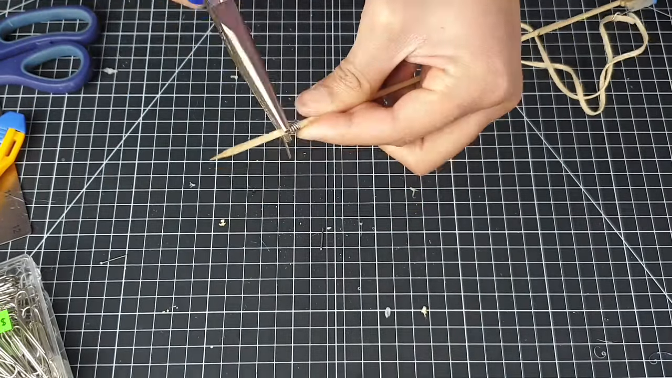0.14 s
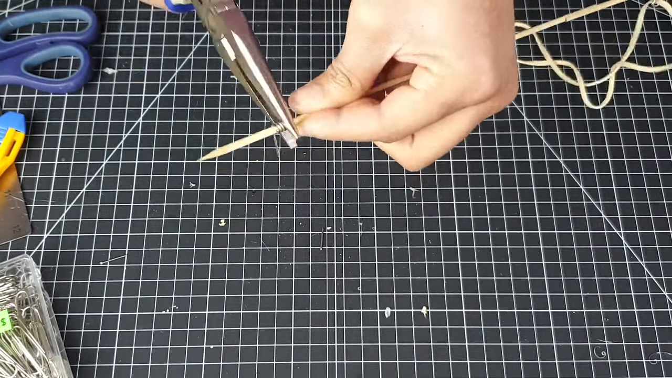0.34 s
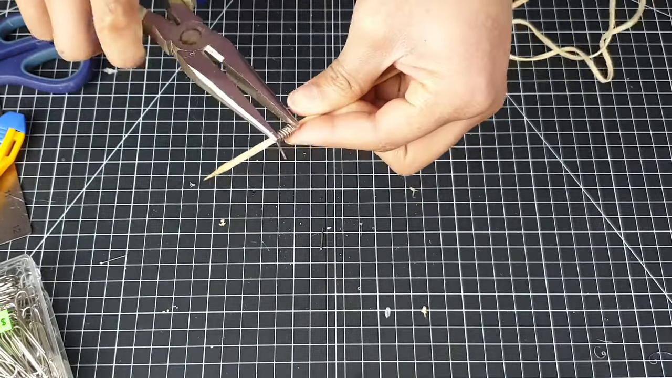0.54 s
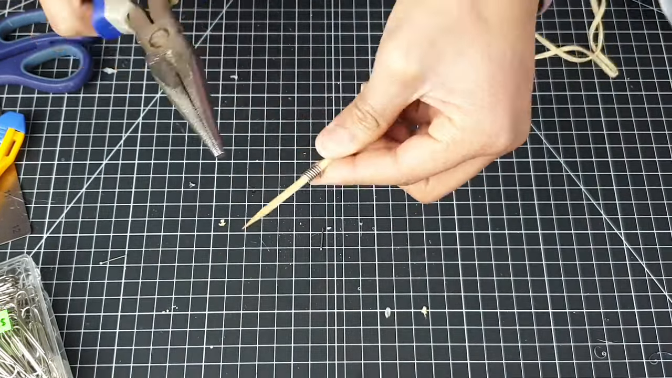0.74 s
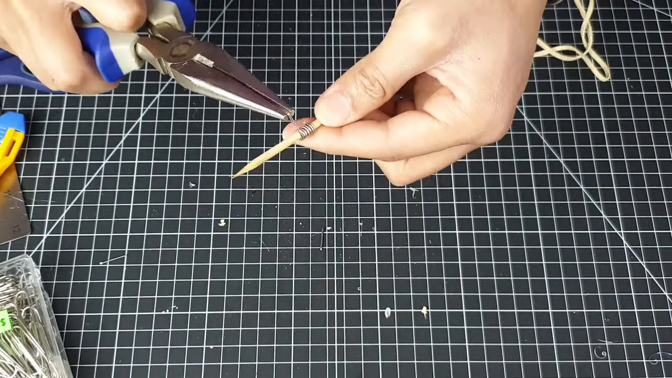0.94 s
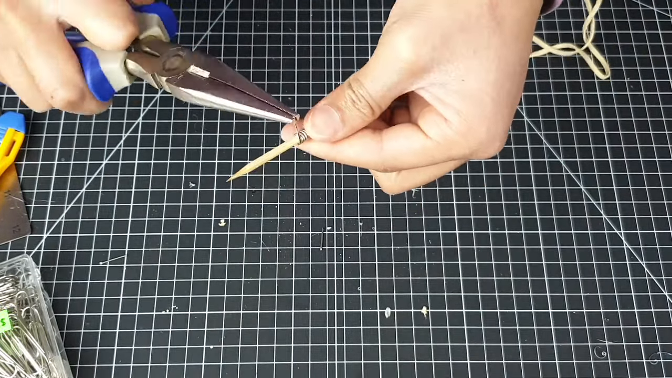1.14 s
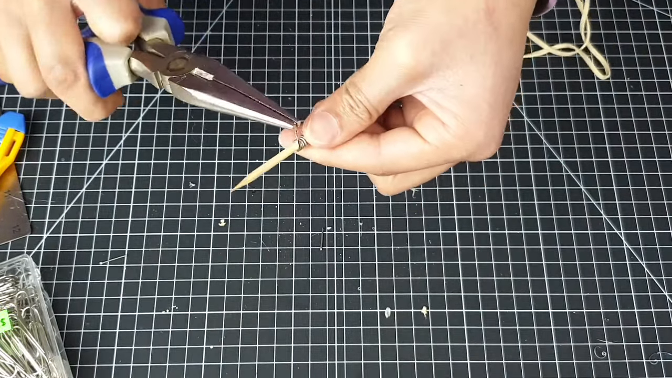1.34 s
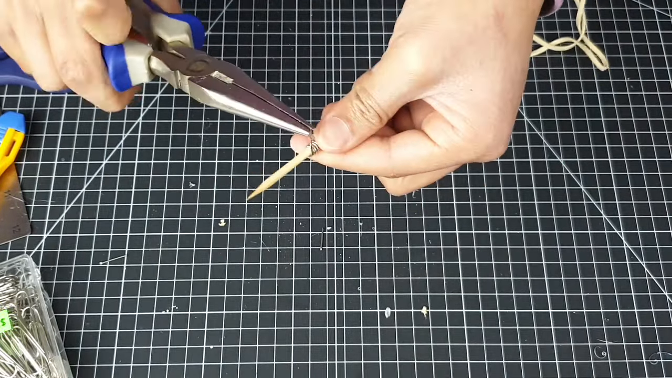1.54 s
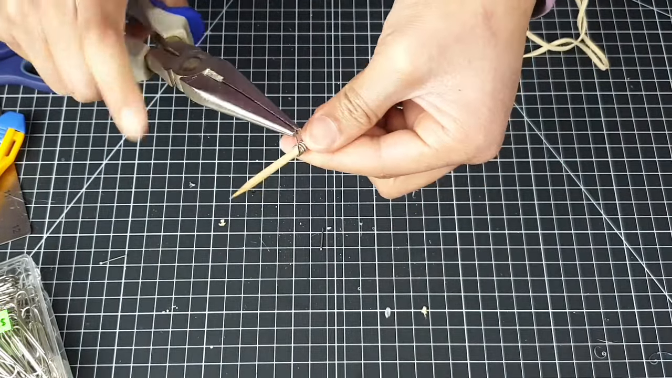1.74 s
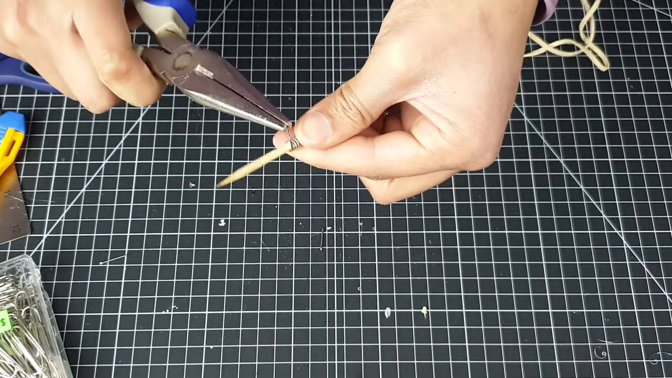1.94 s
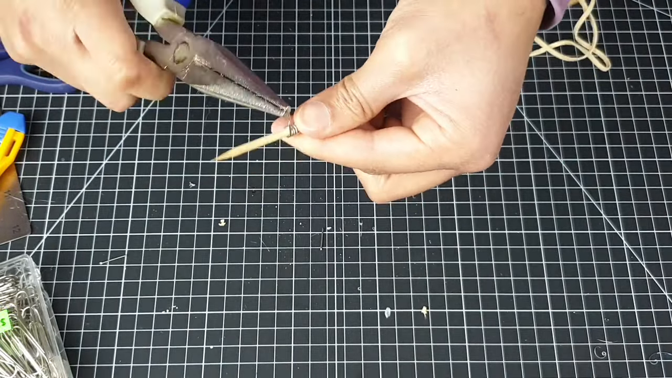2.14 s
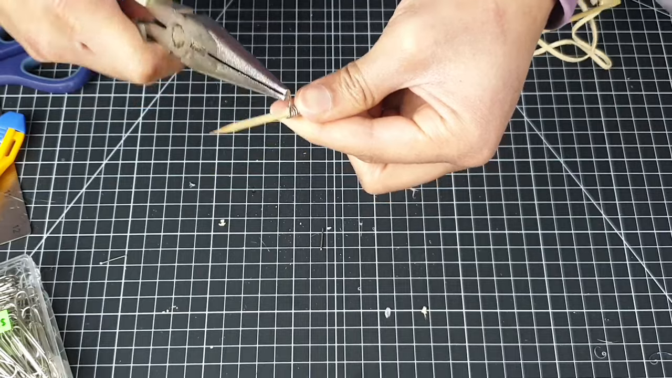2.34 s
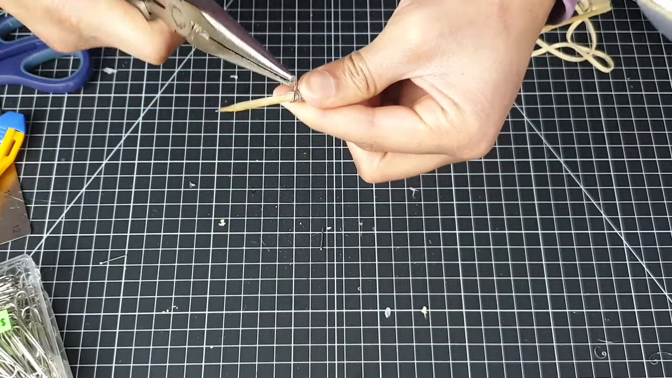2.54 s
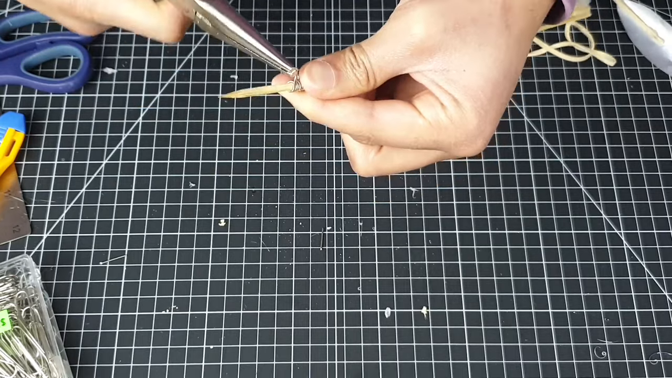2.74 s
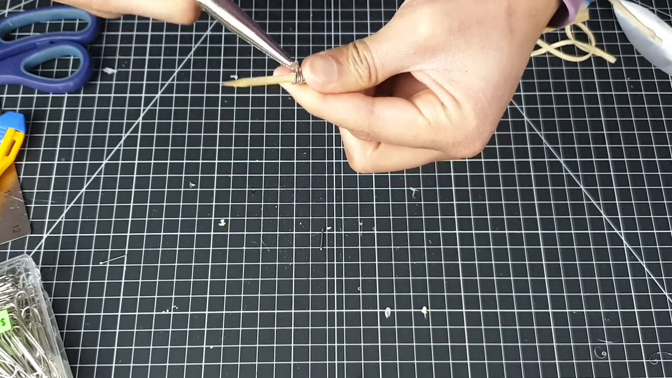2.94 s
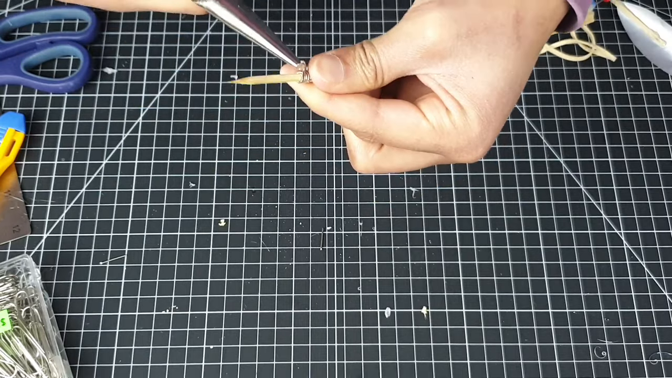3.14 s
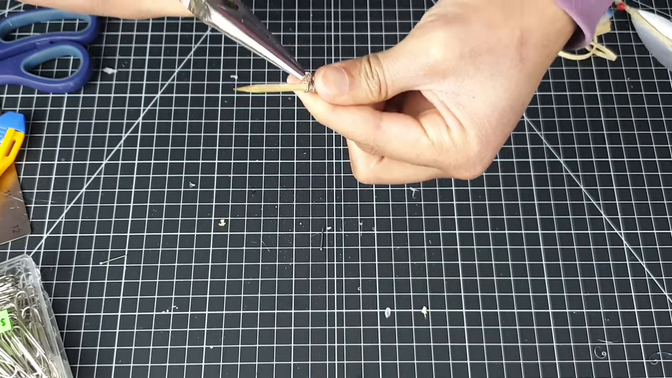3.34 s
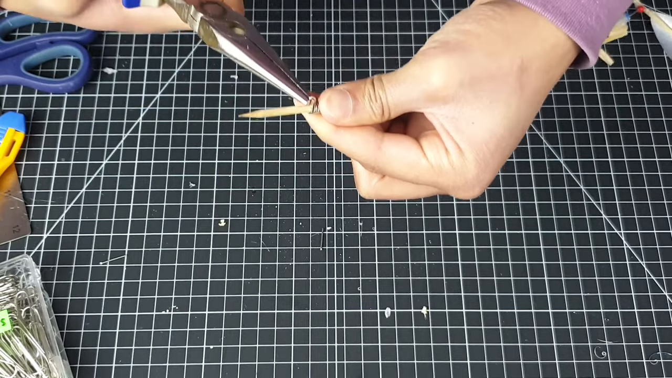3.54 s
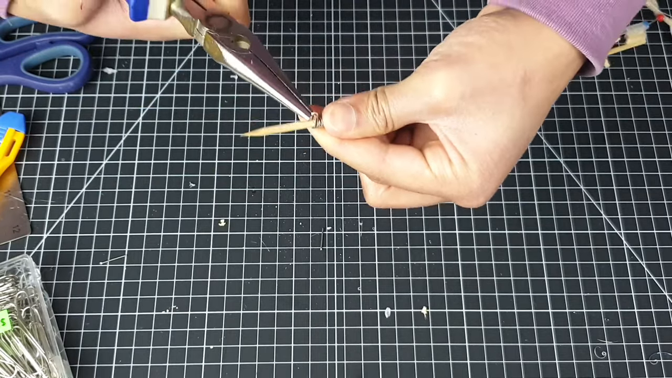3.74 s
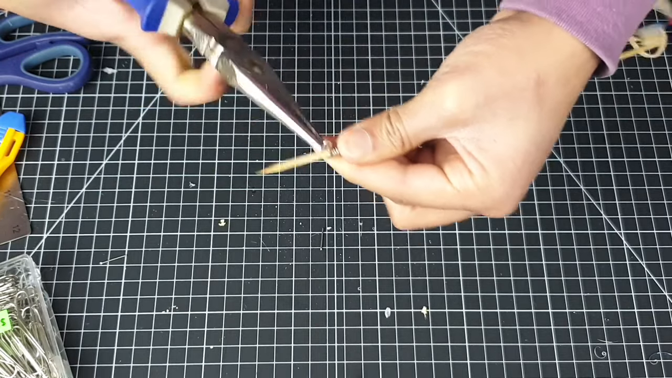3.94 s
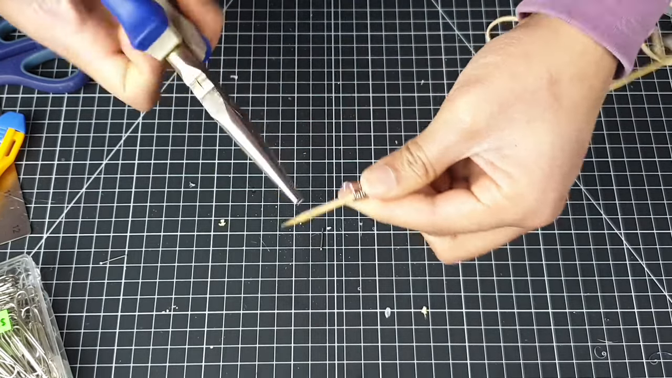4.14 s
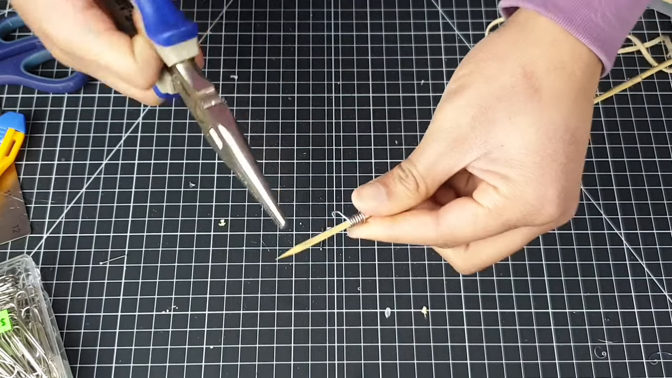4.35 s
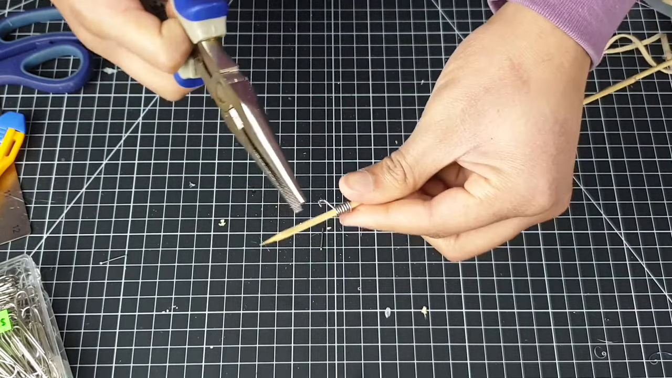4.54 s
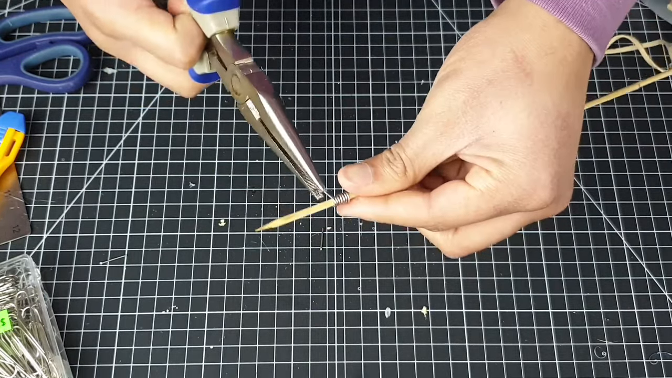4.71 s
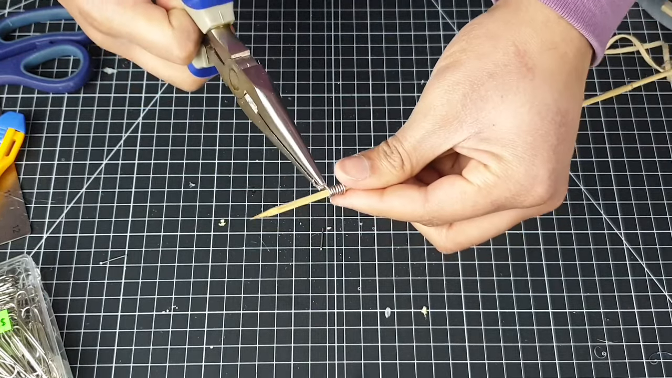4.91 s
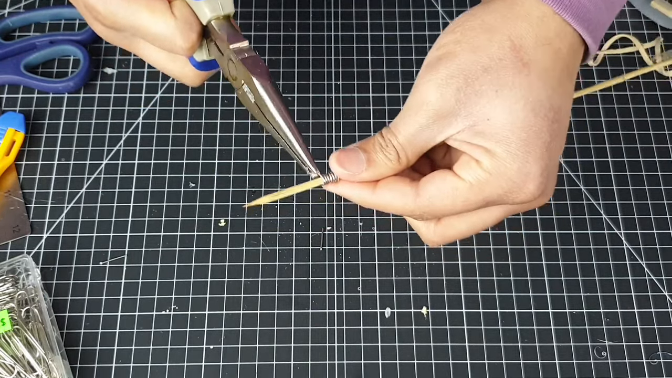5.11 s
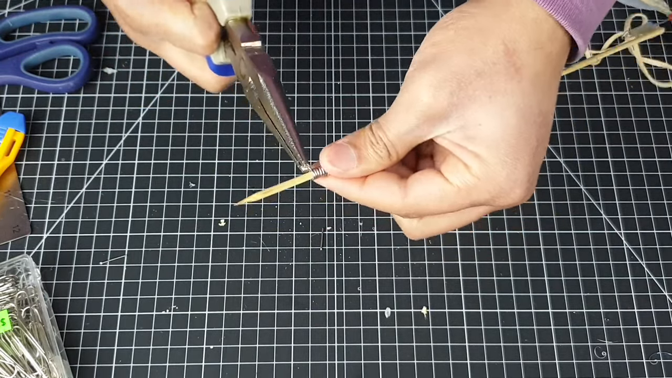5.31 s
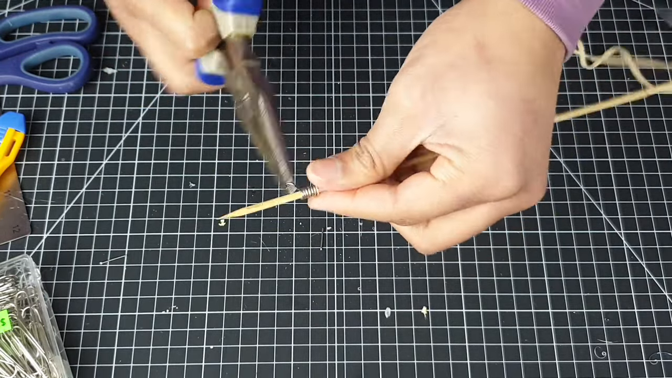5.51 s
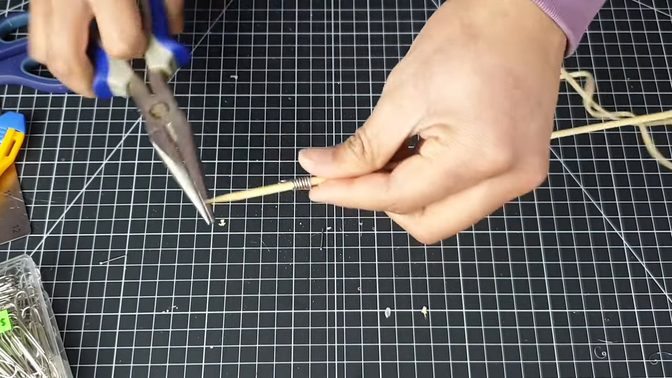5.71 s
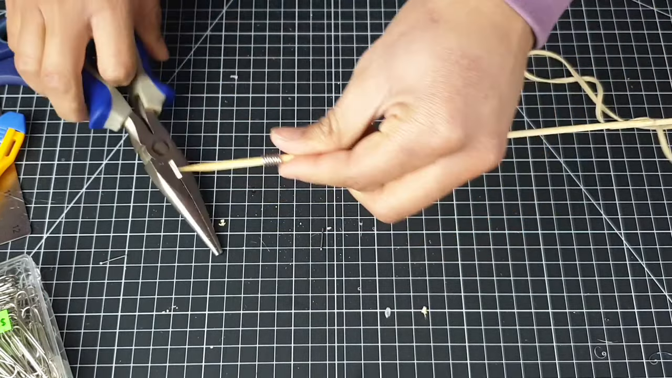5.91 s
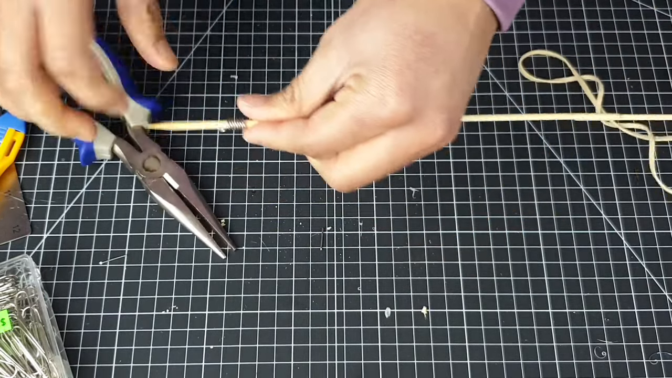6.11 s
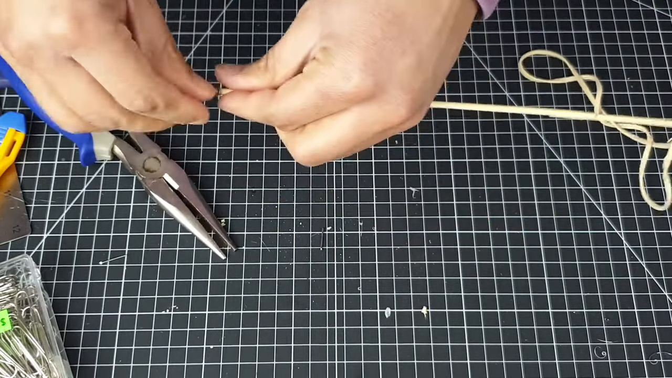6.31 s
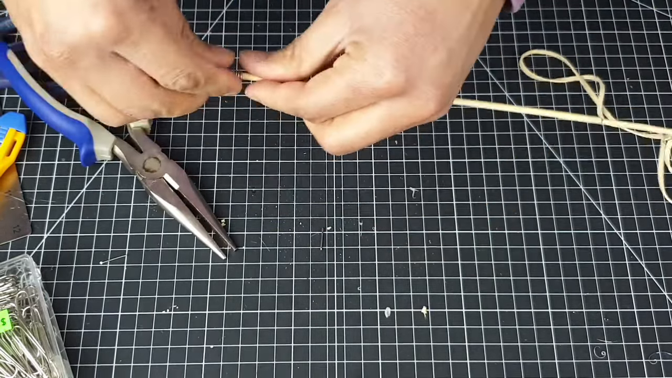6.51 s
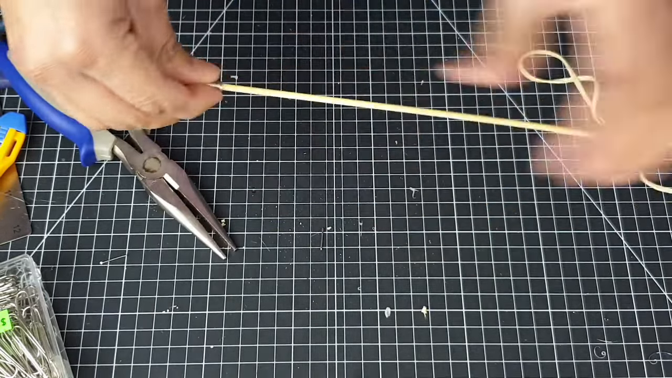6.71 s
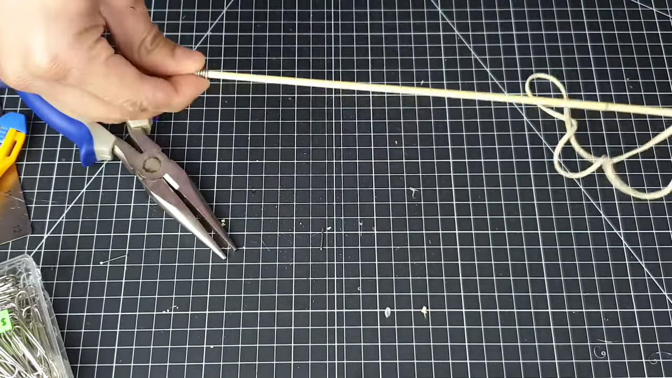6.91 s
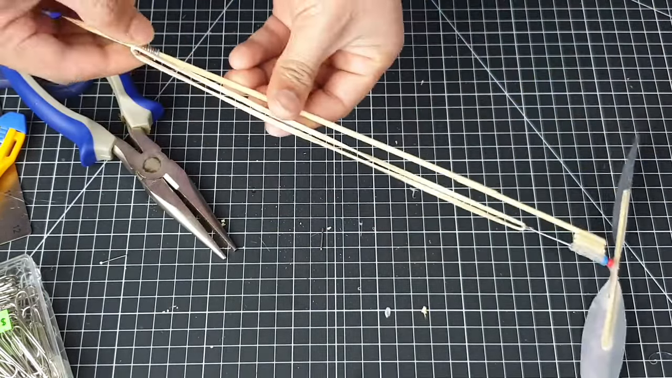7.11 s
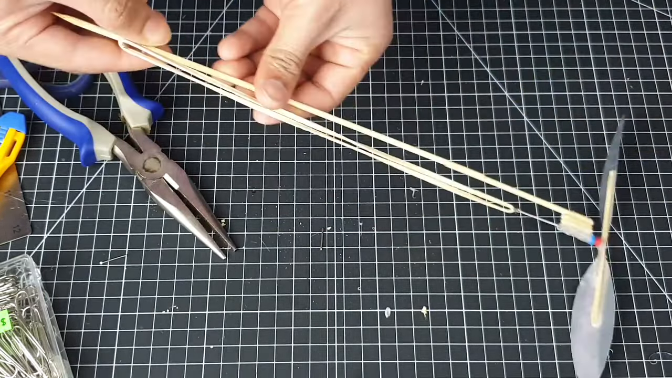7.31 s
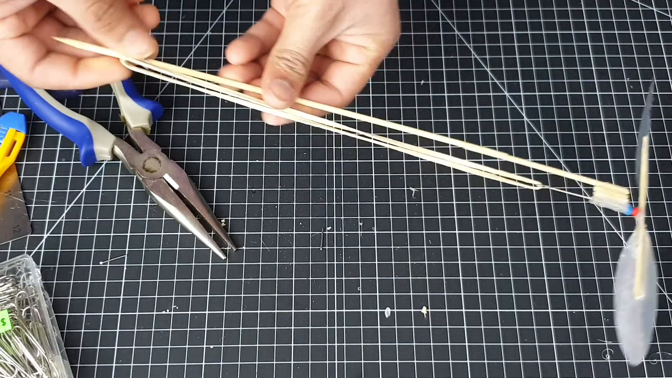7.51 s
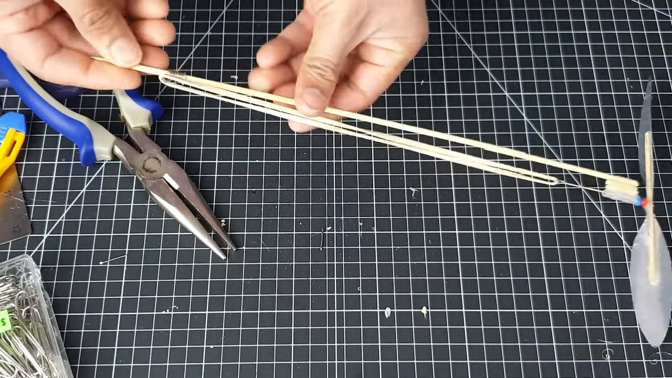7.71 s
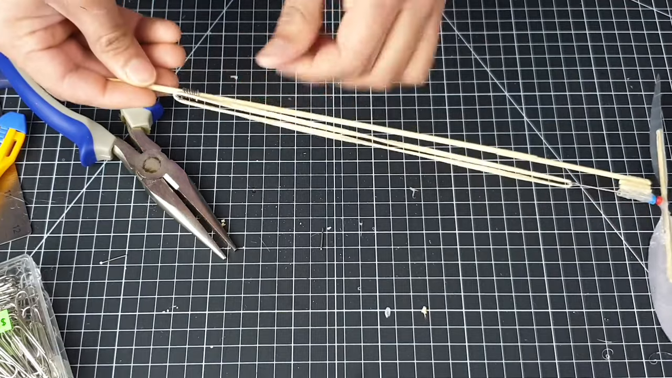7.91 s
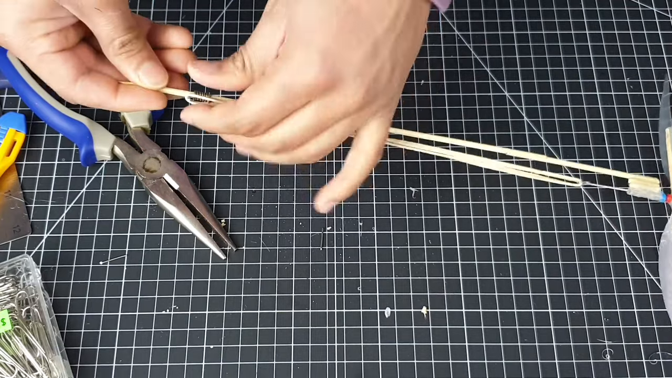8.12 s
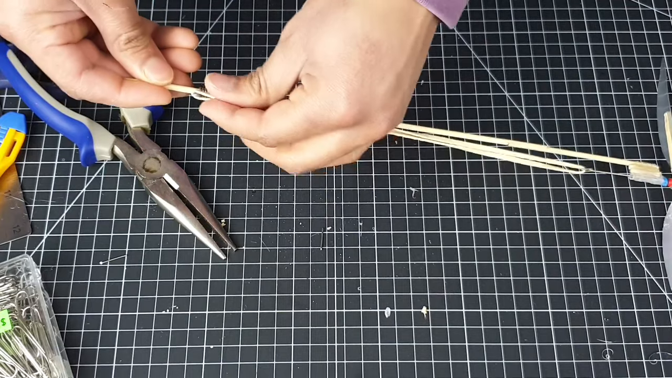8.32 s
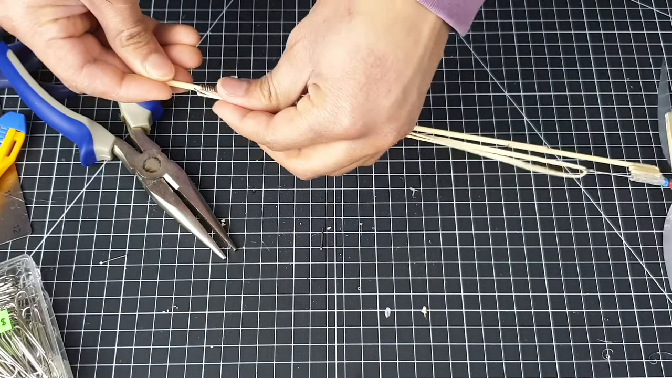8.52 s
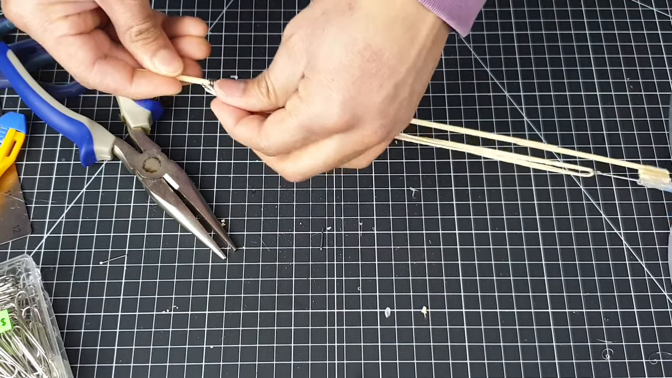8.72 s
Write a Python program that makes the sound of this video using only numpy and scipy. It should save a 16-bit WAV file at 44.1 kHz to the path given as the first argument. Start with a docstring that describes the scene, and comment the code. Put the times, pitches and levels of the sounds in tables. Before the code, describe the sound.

Small ticks and scrapes of wire being twisted, a loud double knock of pliers set down, and a rubber band snap with a brief rattle.

```python
"""A thin hiss and faint ticks, close by: pliers twist wire round the wooden stick of a rubber-band propeller
toy. Then the scene changes to the soft rush of a small live room, while the wire clicks against the jaws and
scrapes in runs of tiny slips. The pliers land on the table with a booming double knock and fingers rub the toy.
Then the rubber band snaps against the stick, and the propeller shaft rattles in its bearing and stops with a
squeak."""
import sys
import numpy as np
from scipy import signal
from scipy.fft import rfft, irfft, next_fast_len
from scipy.io import wavfile

SR = 44100
rng = np.random.default_rng(int(sys.argv[2]) if len(sys.argv) > 2 else 0)


def master_out(mix):
    """Clip the mix to full scale and print it as 16-bit PCM to the path in sys.argv[1]."""
    frames = np.transpose(np.atleast_2d(mix))
    ceiling = np.clip(frames, -1, 1)
    pcm = np.round(ceiling * 32767).astype(np.int16)
    wavfile.write(sys.argv[1], SR, pcm)


N = 386316
TIME = np.arange(N) / SR


def undb(db):
    """Decibels to gain."""
    return 10 ** (np.asarray(db) / 20)


def unit(x):
    """Scale to an energy of one per channel."""
    return x / np.sqrt(np.sum(x ** 2, axis=-1, keepdims=True) + 1e-20)


def read(points, hz):
    """Value of a (Hz, value) curve on a log-frequency axis."""
    f, value = np.transpose(points)
    return np.interp(np.log(np.maximum(hz, 1)), np.log(f), value)


def colour(x, points):
    """Minimum-phase EQ through the given (Hz, dB) points."""
    size = min(2 * next_fast_len(x.shape[-1]), 16384)
    gain = undb(read(points, np.arange(size // 2 + 1) * SR / size))
    cepstrum = irfft(np.log(gain))
    cepstrum[1:size // 2] *= 2
    cepstrum[size // 2 + 1:] = 0
    response = irfft(np.exp(rfft(cepstrum)))[:size // 2]
    response = response.reshape((1,) * (x.ndim - 1) + (-1,))
    return signal.oaconvolve(x, response, axes=-1)[..., :x.shape[-1]]


def fade(t, t60):
    """Exponential decay, 60 dB down after t60 seconds."""
    return np.exp(-np.log(1000) * t / np.maximum(t60, 1e-4))


def ring(modes, t):
    """Impulse response of a set of (Hz, dB, t60) modes."""
    return sum(undb(db) * fade(t, t60) * np.sin(2 * np.pi * hz * t) for hz, db, t60 in modes)


def resonate(drive, modes, t):
    """The ringing that a stereo signal draws from a set of modes, at unit energy."""
    return unit(signal.fftconvolve(drive, ring(modes, t)[None])[:, :drive.shape[1]])


def wander(per_s):
    """Random drift with a spread near one."""
    knots = np.arange(0, N + SR, SR / per_s)
    return np.interp(np.arange(N), knots, rng.standard_normal(len(knots)))


def pan(pan_db):
    """Stereo gains for a level difference of left minus right."""
    return undb(np.array([[pan_db], [-pan_db]]) / 2)


def add(out, start_s, x):
    """Mix a sound in at its time."""
    i = max(int(start_s * SR), 0)
    out[:, i:i + x.shape[-1]] += x[:, :max(N - i, 0)]


# EQ of the hiss. Each row: frequency in Hz, gain in dB.
HISS_EQ = [(120, -34), (300, -9.5), (600, -11), (2000, -16.5), (3200, -4.5), (5000, 0.5), (9000, -15),
           (16000, -31)]


def hiss(level_db=-70, pan_db=12, tone_hz=3460, tone_db=-6):
    """A thin, bright hiss with a fluttering tone in it."""
    noise = unit(colour(rng.standard_normal((2, N)), HISS_EQ))
    tone = resonate(noise, [(tone_hz, 0, .022)], TIME[:SR // 2])
    flutter = undb(tone_db + 2 * wander(20))
    return (noise + flutter * tone) * np.sqrt(N) * undb(level_db) * pan(pan_db)


# Pan path of the working tip. Each row: time in seconds, left minus right in dB.
TIP_PAN = [(1.15, 11), (1.5, 5.5), (2.4, 5.5), (2.8, 7.5), (3.3, 6), (4.4, 6), (5.3, 11.5), (5.65, 3)]


def tip_pan(s):
    """Stereo gains of a sound made at the tip at time s."""
    return pan(np.interp(s, *np.transpose(TIP_PAN)))


def blend(wood, metal, hardness):
    """Body and treble between soft wood (hardness 0) and bare metal (hardness 1)."""
    return np.array(wood) + hardness * (np.array(metal) - np.array(wood))


# Base EQ of every click and scrape. Each row: frequency in Hz, gain in dB.
CONTACT_EQ = [(150, -21), (400, -11.5), (900, -7), (1700, -1.5), (3200, -2.5), (4800, 2), (7400, -1),
              (8300, -9), (10300, -3.5), (13000, -8), (16000, -17.5)]


def contact_colour(x, body_db, treble_db):
    """Voice a contact: soft wood adds body, bare metal adds treble."""
    tilt = [(200, min(body_db, 0) - 2), (1000, body_db - 1), (1900, body_db),
            (3800, 0), (7200, 0), (10000, treble_db)]
    return unit(colour(colour(x, CONTACT_EQ), tilt))


def slips(size, per_s, spread_db):
    """Tiny stick-slip impulses of very unequal strength."""
    strength = undb(spread_db * np.minimum(rng.exponential(size=size), 4))
    return (rng.random(size) < per_s / SR) * strength * rng.choice([-1, 1], size)


def grit(force, t60):
    """Every slip gives its own tiny burst of noise, different at each ear."""
    power = signal.fftconvolve(force ** 2, fade(TIME[:2048], t60) ** 2)[:len(force)]
    return np.sqrt(np.abs(power)) * rng.standard_normal((2, len(force)))


def scatter(t60, size=2048):
    """Brief gritty ring of stick, jaws and nearby surfaces, different at each ear."""
    grain = undb(3 * np.repeat(rng.standard_normal(size // 32), 32))
    return unit(rng.standard_normal((2, size)) * grain * fade(TIME[:size], t60))


SCRAPE_WOOD, SCRAPE_METAL = (10, -5), (-11, 2)  # body and treble in dB
SLIDE_LEAD_S = .08  # from the start of a slide to its peak


def slide(db, length_s, hardness, ring_share, modes, size=8192):
    """A run of slips swells and dies away: fine grit and coarser ticks set the modes ringing."""
    t = TIME[:size]
    swell = np.exp(-2 * ((t - SLIDE_LEAD_S) / length_s) ** 2)
    fine = grit(slips(size, per_s=1500, spread_db=3.5) * swell, t60=.007)
    coarse_slips = slips(size, per_s=450, spread_db=3.5) * swell
    coarse = signal.fftconvolve(coarse_slips[None], scatter(t60=.011))[:, :size]
    rub = contact_colour(.5 * unit(fine) + unit(coarse), *blend(SCRAPE_WOOD, SCRAPE_METAL, hardness))
    return unit(rub + ring_share * resonate(rub, modes, t)) * np.sqrt(length_s * SR) * undb(db)


# Ring of the steel wire in the jaws. Each row: frequency in Hz, gain in dB, t60 in seconds.
WIRE_MODES = [(1740, -1.5, 0.0095), (3280, 1, 0.017), (4550, 1, 0.019), (4750, 1, 0.015)]
# Stretches of faint handling. Each row: start in seconds, end in seconds, level in dB.
GRIP_SHIFTS = [(0.01, .22, -74), (2.201, 2.36, -65), (2.598, 2.72, -60.5), (3.236, 3.38, -63.5),
               (5.482, 5.6, -65.5), (6.269, 6.44, -61), (6.991, 7.14, -62.5)]


def fumbling(per_s=26, typical_s=0.015, spread_db=3):
    """Faint little slides come at loose intervals while the fingers shift their grip."""
    out = np.zeros((2, N))
    for start, end, db in GRIP_SHIFTS:
        for slot, (delay, softness, stretch) in enumerate(rng.random((3, 8)).T):
            s = start + (slot + delay) / per_s
            if s < end:
                rub = slide(db + spread_db * (1 - 2 * softness), typical_s * (.5 + stretch),
                            hardness=1, ring_share=0.077, modes=WIRE_MODES)
                add(out, s - SLIDE_LEAD_S, rub * tip_pan(s))
    return out


# Ring of the wooden stick. Each row: frequency in Hz, gain in dB, t60 in seconds.
STICK_MODES = [(2180, 9, 0.036), (2970, 15.5, 0.011), (3734, 1, 0.074)]
# Wire or rubber sliding. Each row: peak time in seconds, level in dB, length in seconds,
# hardness from 0 to 1, share of ringing.
SCRAPE_CUES = [(.435, -64, 0.0072, 1, 0.15), (0.515, -66, 0.0091, 1, 0.07),
               (2.83, -42.5, 0.034, 0.09, 0.87), (2.988, -54, 0.019, 0.6, 0.16),
               (3.408, -43, 0.012, 0.54, 0.065), (3.447, -37.5, 0.0072, 0.77, 0.13),
               (3.484, -36.5, 0.0069, 0.9, 0.15), (3.519, -43, 0.009, 0.61, 0),
               (3.619, -42, 0.0096, 0.68, 0), (3.727, -49.5, 0.014, 0.47, 0.037),
               (3.791, -53.5, 0.026, 0.48, 0), (3.889, -52.5, 0.029, 0.44, 0.33),
               (4.032, -57.5, 0.058, 0.47, .1), (4.206, -40, 0.013, 1, 0.32),
               (7.146, -52.5, 0.023, 0.27, 0.077), (7.352, -44, 0.021, 0.24, 0.062),
               (8.44, -61.5, 0.0066, 0.28, 0.043), (8.677, -43.5, 0.0081, 0.9, 0.67),
               (8.725, -45, 0.038, 1, .55)]


def scrapes(pliers_down_s=6):
    """The wire slides under the jaws; once the pliers are down, fingers rub stick and band."""
    out = np.zeros((2, N))
    for s, db, length_s, hardness, ring_share in SCRAPE_CUES:
        modes = WIRE_MODES if s < pliers_down_s else STICK_MODES
        add(out, s - SLIDE_LEAD_S, slide(db, length_s, hardness, ring_share, modes) * tip_pan(s))
    return out


def contact(db, body_db, treble_db, ring_t60=0.036, rise_s=.0009):
    """A contact breaks free and leaves a short, dense ring, with the energy of a 3 ms burst at db."""
    burst = scatter(ring_t60)
    attack = 1 - np.exp(-TIME[:burst.shape[1]] / rise_s)
    return contact_colour(burst * attack, body_db, treble_db) * np.sqrt(.003 * SR) * undb(db)


CLICK_WOOD, CLICK_METAL = (7.3, -22), (-12, 13.4)  # body and treble in dB
# Sharp ticks of wire, pliers, stick and band. Each row: start in seconds, level in dB,
# hardness from 0 (wood) to 1 (metal).
CLICK_CUES = [(0.743, -51, 0.85), (0.894, -51.5, 0.8), (1.1121, -54.5, 0.62), (1.5355, -44.5, 0.88),
              (1.921, -47.5, 0.68), (2.0897, -46, .65), (2.368, -44, 0.75), (2.4573, -50.5, 0.79),
              (2.545, -43, 0.39), (4.092, -46, 0.77), (4.1119, -38, 0.8), (4.2861, -43.5, 0.6),
              (4.4194, -42.5, 0.63), (4.5372, -46, 0.58), (4.799, -48.5, 0.5), (4.931, -55.5, .25),
              (4.9746, -56, 0.1), (5.1545, -57, 0.17), (5.244, -55.5, 0.1), (5.329, -52, 0.12),
              (5.6546, -39, 0.71), (6.45, -38, 0.78), (6.547, -44, 0.87), (7.0893, -44, 0.61),
              (7.1595, -44, .75), (7.379, -44.5, 0.54), (8.6969, -35, 0.73)]


def clicks(rebound_db=-13, rebound_s=0.014, give_db=-18, give_s=.003):
    """Jaws, wire and stick give a little, tick against each other and touch once more, softly."""
    out = np.zeros((2, N))
    for s, db, hardness in CLICK_CUES:
        tone = blend(CLICK_WOOD, CLICK_METAL, hardness)
        add(out, s - give_s, contact(db + give_db, *tone) * tip_pan(s))
        add(out, s, contact(db, *tone) * tip_pan(s))
        add(out, s + rebound_s * (.5 + rng.random()), contact(db + rebound_db, *tone) * tip_pan(s))
    return out


# Reverb decay by band. Each row: frequency in Hz, t60 in seconds.
WALL_DECAY = [(150, 0.92), (2500, 0.5), (5000, 0.44), (9000, 0.31), (15000, 0.28)]


def room_reverb(wet_db=-3.0, build_s=0.0098):
    """Diffuse impulse response of bare walls; the treble dies first."""
    t = TIME[:SR]
    spectrum = rfft(rng.standard_normal((2, SR)))
    centres = [hz for hz, _ in WALL_DECAY]
    tail = 0
    for weights, (_, t60) in zip(np.eye(len(centres)), WALL_DECAY):
        band = read(list(zip(centres, weights)), np.arange(spectrum.shape[1]))
        tail = tail + irfft(spectrum * band, SR) * fade(t, t60)
    onset = (1 - fade(t, 2 * build_s)) * (t > build_s / 2)
    return undb(wet_db) * unit(tail * onset)


# EQ of the room tone. Each row: frequency in Hz, gain in dB.
RUSH_EQ = [(25, -24), (80, -9.5), (350, -16.5), (520, -5), (660, -3), (1070, -2.5), (1600, -12.5),
           (2700, -28.5), (4700, -19), (7200, -27.5), (8300, -31.5), (11700, -23.5), (16000, -32.5)]
# Its lean to the left. Each row: frequency in Hz, left minus right in dB.
RUSH_PAN = [(200, 3), (700, 15.5), (1300, 19.5), (2400, 4)]


def room_rush(level_db=-65, waver_db=5.5, hum_hz=655, hum_db=-78, hum_pan_db=12):
    """A drifting rush like a small fan off to the left, with one wavering tone in it."""
    left, right = rng.standard_normal((2, N))
    right = colour(right, [(hz, -db) for hz, db in RUSH_PAN])
    rush = colour(np.array([left, right]), RUSH_EQ)
    rush = rush / rush[0].std() * undb(level_db + waver_db * wander(2.46))
    pitch_hz = hum_hz + 5 * wander(20)
    hum = np.sin(2 * np.pi * np.cumsum(pitch_hz) / SR) * undb(hum_db + 3.5 * wander(6))
    return rush + hum * pan(hum_pan_db)


# Lifts in the room tone. Each row: peak time in seconds, level in dB.
SWELL_CUES = [(2.12, -66), (5.402, -66.5)]


def rush_swells(width_s=0.22, pan_db=12):
    """The rush rises briefly and softly in its midrange."""
    mid_eq = [(500, -19), (800, -2.5), (980, -0.5), (1200, -7.5), (1800, -32.5)]
    noise = unit(colour(rng.standard_normal((2, N)), mid_eq)) * np.sqrt(N)
    level = sum(undb(db) * np.exp(-((TIME - s) / width_s) ** 2) for s, db in SWELL_CUES)
    return noise * level * pan(pan_db)


# Pitched pings of steel. Each row: start in seconds, level in dB, pitch in Hz, t60 in seconds.
CLINK_CUES = [(2.738, -43.5, 4570, .02), (2.8537, -41, 4800, .012), (2.868, -43, 4700, .015),
              (5.991, -32, 10130, 0.056), (6.137, -28, 4120, 0.01), (8.6139, -41.5, 3830, .04)]


def clinks(ring_db=-2, hardness=.3, size=6144):
    """A tick on wire or jaws sets a few close steel partials ringing briefly."""
    out = np.zeros((2, N))
    for s, db, hz, t60 in CLINK_CUES:
        tick = contact(db, *blend(CLICK_WOOD, CLICK_METAL, hardness))
        partials = [(hz * .95, -5, t60 / 2), (hz, 0, t60), (hz * 1.06, -3, t60 / 2)]
        attack = tick[:, :SR // 300]
        ping = unit(signal.fftconvolve(attack, ring(partials, TIME[:size])[None]))
        add(out, s, tick * tip_pan(s))
        add(out, s, undb(ring_db) * ping * np.linalg.norm(tick[0]) * tip_pan(s))
    return out


# Ring of the table top. Each row: frequency in Hz, gain in dB, t60 in seconds.
TABLE_MODES = [(82.4, -7, .65), (122.4, -9.5, 0.65), (162.4, -0.5, 0.59), (190.4, -2, 0.73),
               (228.3, -2.5, 0.45), (298.3, -7.5, .6), (398.6, -4.5, 0.25), (471, -6.5, 0.3),
               (562, -1.5, 0.21), (740, -11.5, 0.55), (1114, -9, 0.55)]
# EQ of its boom. Each row: frequency in Hz, gain in dB.
BOOM_EQ = [(27, -45), (48, -7), (100, -6.5), (170, -10), (400, -2.5), (900, -8), (2000, -30), (5000, -48.5)]
# Blows that reach the table: the pliers landing, then a faint one as the band snaps.
# Each row: start in seconds, level in dB, contact time in milliseconds.
TABLE_BLOWS = [(5.969, -20, 0.72), (5.984, -7.5, 1.45), (6.054, -30.5, 0.46), (6.0818, -4, 1.071),
               (6.123, -14.5, 1.29), (7.772, -50, 0.26)]


def table_knocks(flex_hz=185, flex_t60=0.008, modes_db=-20, boom_db=9, boom_t60=0.72, pan_db=7):
    """Each blow pushes the table top: one deep flex, then its modes and a dense boom die away."""
    t = TIME[:SR]
    noise = rng.standard_normal((3, SR))
    wide_noise = noise[0] + 0.4 * noise[1:]  # mostly common to both ears
    boom = unit(colour(wide_noise * fade(t, boom_t60), BOOM_EQ))
    # an open board hardly radiates its slowest motion
    low_cut = signal.butter(2, 110, "highpass", fs=SR, output="sos")
    flex = signal.sosfilt(low_cut, ring([(flex_hz, 0, flex_t60)], t))
    response = 2 * flex + undb(modes_db) * ring(TABLE_MODES, t) + undb(boom_db) * boom
    out = np.zeros((2, N))
    for s, db, contact_ms in TABLE_BLOWS:
        push = np.sin(np.pi * np.minimum(t[:SR // 100] * 1000 / contact_ms, 1))
        add(out, s, signal.fftconvolve(response, push[None] / push.sum()) * undb(db))
    return out * pan(pan_db)


def clacks(boost_db=16, loss_db_per_ms=30, pan_db=6):
    """Each blow also clacks: loudly for the brief contact of steel, hardly at all for soft handles."""
    out = np.zeros((2, N))
    for s, db, contact_ms in TABLE_BLOWS:
        clack_db = db + boost_db - loss_db_per_ms * contact_ms
        clack = contact(clack_db, body_db=9.5, treble_db=2)
        shelf_db = np.clip(40.5 + 2 * clack_db, -20, 10)  # stronger clacks are brighter
        add(out, s, colour(clack, [(3000, 0), (7000, shelf_db)]))
    return out * pan(pan_db)


# EQ of the shaft's rattle. Each row: frequency in Hz, gain in dB.
SHAFT_EQ = [(200, -33), (1000, -9.5), (2300, -10.5), (3000, -3), (4500, 5), (7200, 0.5), (8500, -7),
            (10900, 1), (16000, -14)]


def propeller(snap_s=7.7717, snap_db=-20.5, spin_s=.45, run_out_s=0.13, spin_db=-47,
              turns_per_s=28, stick_db=-7, pan_db=3):
    """The band snaps; the shaft rubs and knocks to and fro in its bearing; the stick rings along."""
    t = TIME[:SR]
    spin_level = np.clip((spin_s - t) / run_out_s, 0, 1)
    turns = turns_per_s * t
    knock = np.exp(-(turns % 1) / 0.2)
    back_knock = 0.35 * np.exp(-((turns + .5) % 1) / 0.2)  # half a turn later
    force = slips(SR, per_s=1100, spread_db=3.2) * (.15 + knock + back_knock) * spin_level
    rattle = unit(colour(grit(force, t60=.008), SHAFT_EQ))
    stick = undb(stick_db) * resonate(rattle, STICK_MODES, t)
    out = np.zeros((2, N))
    add(out, snap_s, contact(snap_db, *blend(CLICK_WOOD, CLICK_METAL, hardness=0.64)))
    add(out, snap_s, (rattle + stick) * np.linalg.norm(spin_level) * undb(spin_db))
    return out * pan(pan_db)


# Ring of the shaft and its hook. Each row: frequency in Hz, gain in dB, t60 in seconds.
HOOK_MODES = [(4358, 0, .045), (4500, 0, .02), (5073, -7, .012)]


def shaft_squeak(catch_s=8.23, catch_db=-43.5, stop_s=8.254, stop_db=-35.5, squeak_s=0.018):
    """The shaft catches softly, then stops with a short, damped squeak of its hook."""
    out = np.zeros((2, N))
    for s, db, length_s in (catch_s, catch_db, squeak_s / 2), (stop_s, stop_db, squeak_s):
        rub = slide(db, length_s, hardness=0.99, ring_share=0.87, modes=HOOK_MODES)
        add(out, s - SLIDE_LEAD_S, rub * tip_pan(s))
    return out


def scene(scene_change_s=1.2, opening_send=0.56, squeak_send=0.48):
    """The opening scene is thin and drier; then the scene changes, and the rush and the full reverb come in all
    at once."""
    live = TIME >= scene_change_s
    background = np.where(live, room_rush() + rush_swells(), hiss())
    knocks, walls, squeak = table_knocks(), room_reverb(), shaft_squeak()
    near = clicks() + clinks() + clacks() + scrapes() + propeller() + fumbling()
    send = near * np.where(live, 1, opening_send) + squeak_send * squeak
    reverb = signal.fftconvolve(send, walls, axes=1)[:, :N]
    return near + squeak + reverb + knocks + background


def record(dry, low_hz=34, top_hz=15900):
    """Roll off the deepest rumble and cut the very top."""
    low_cut = signal.butter(3, low_hz, "highpass", fs=SR, output="sos")
    high_cut = signal.ellip(8, .2, 70, top_hz, fs=SR, output="sos")
    return signal.sosfilt(high_cut, signal.sosfilt(low_cut, dry))


dry = scene()
out = record(dry)
master_out(out)
```